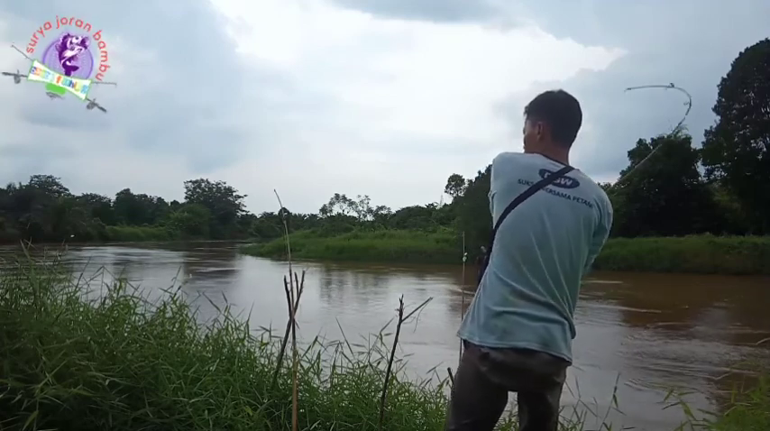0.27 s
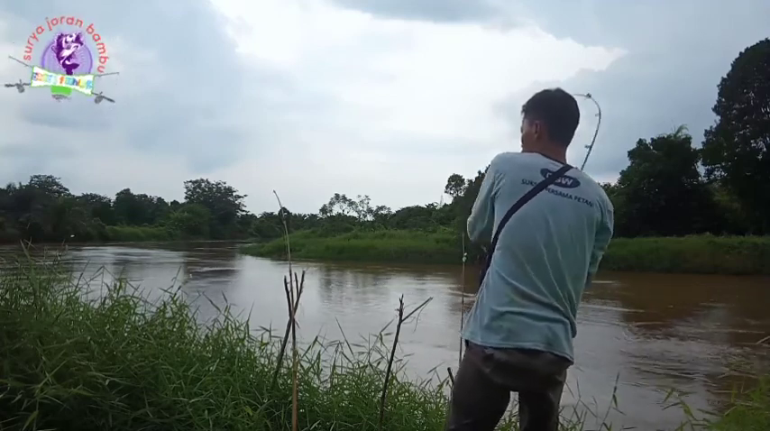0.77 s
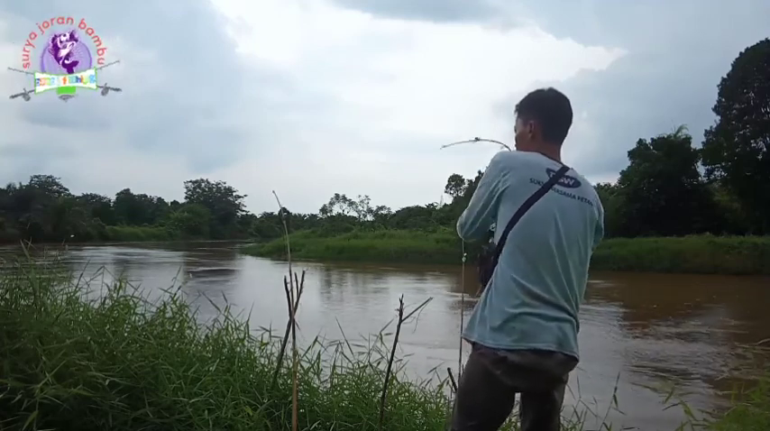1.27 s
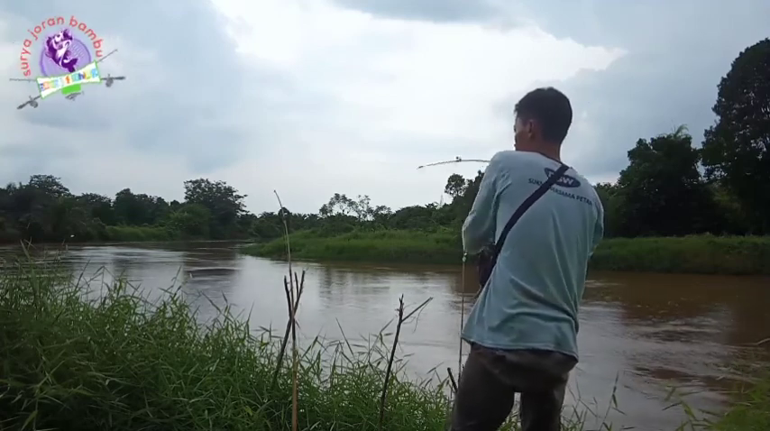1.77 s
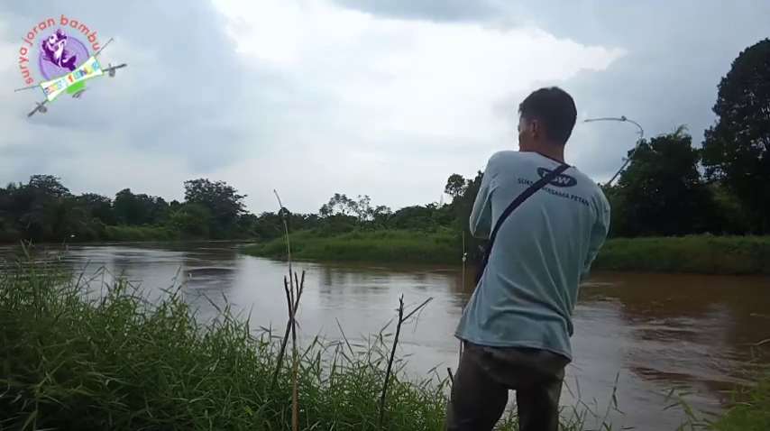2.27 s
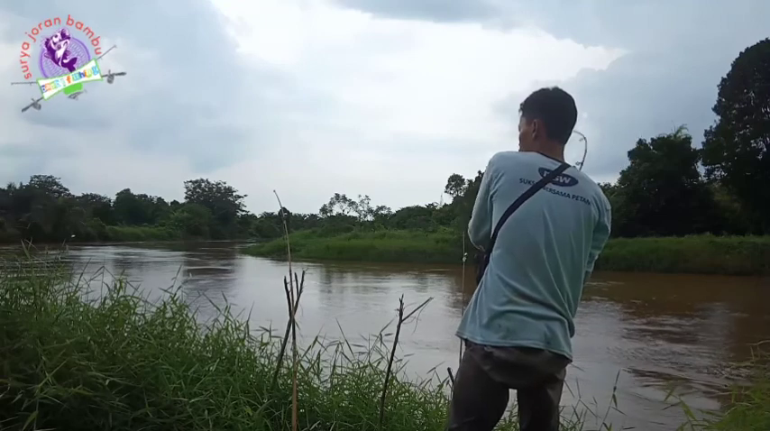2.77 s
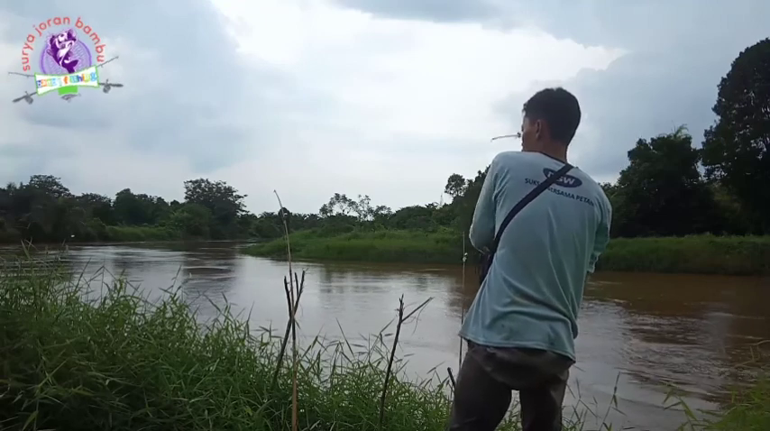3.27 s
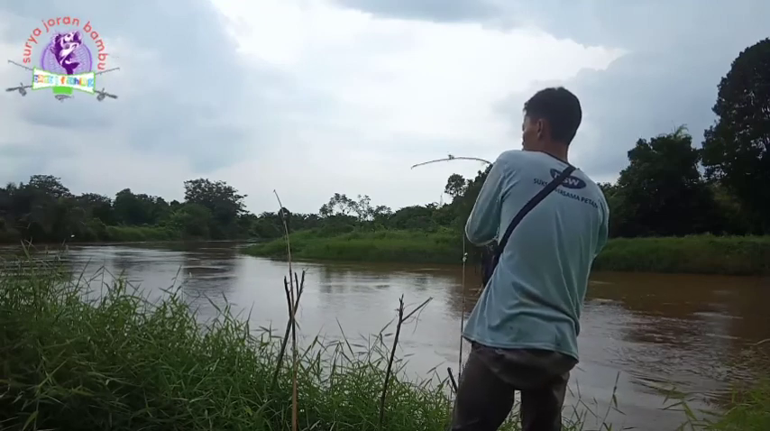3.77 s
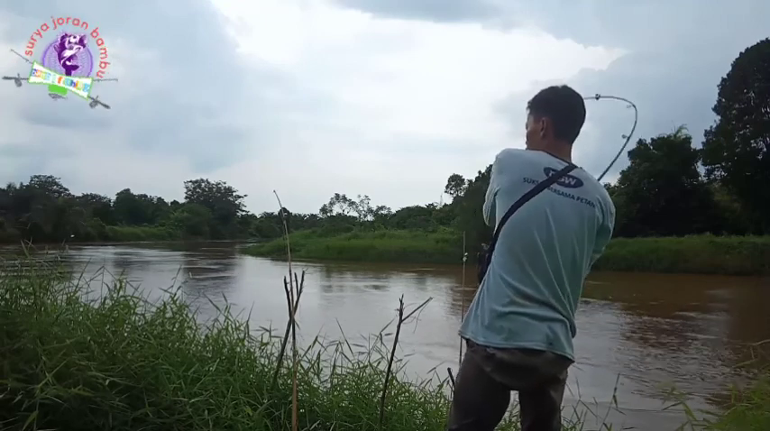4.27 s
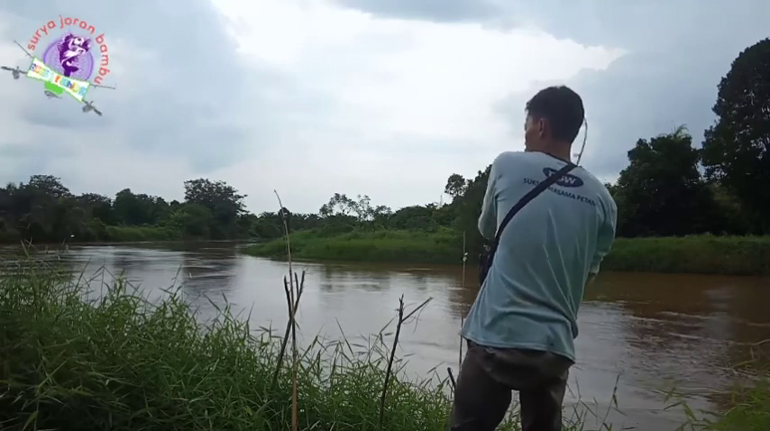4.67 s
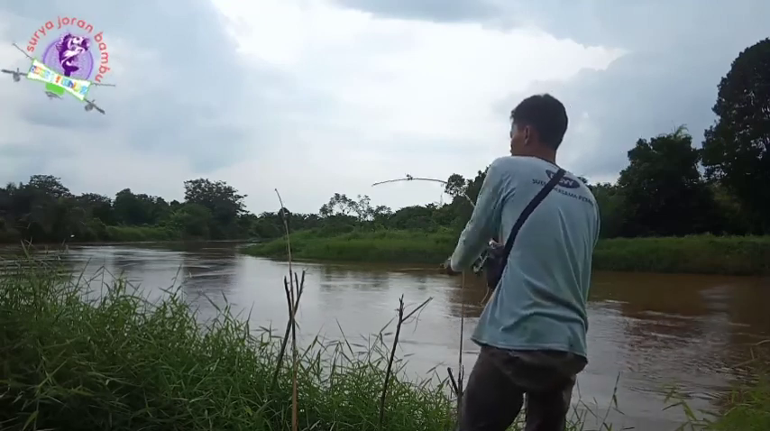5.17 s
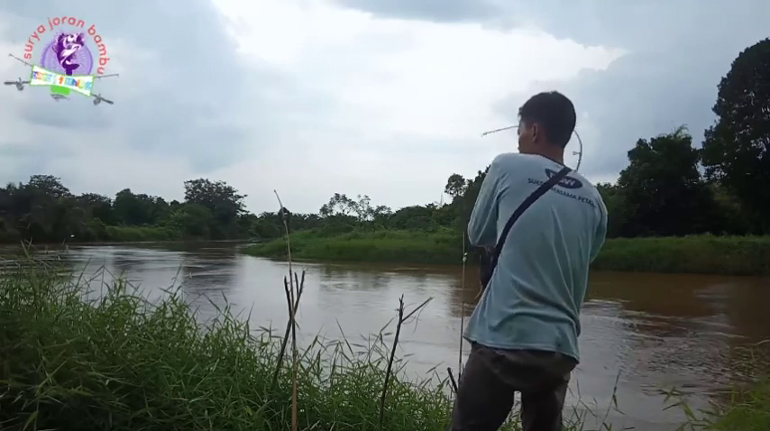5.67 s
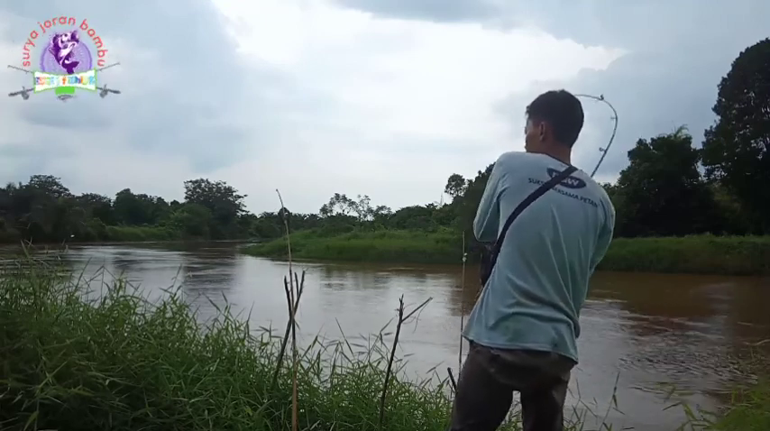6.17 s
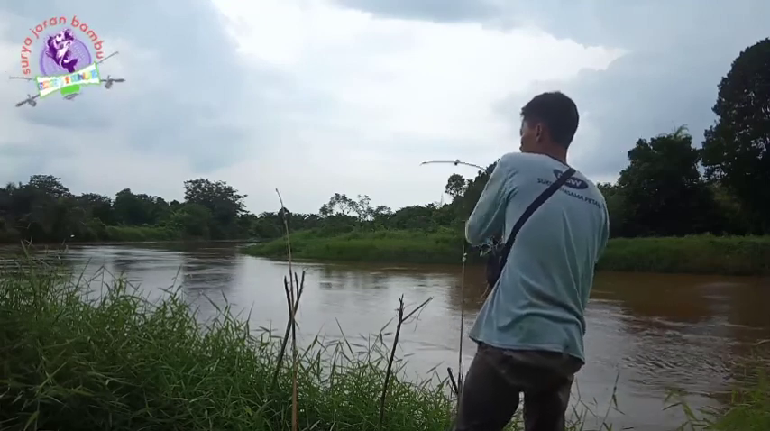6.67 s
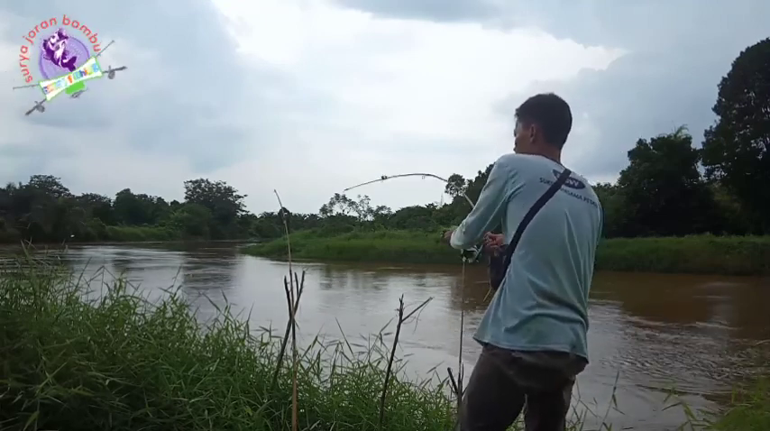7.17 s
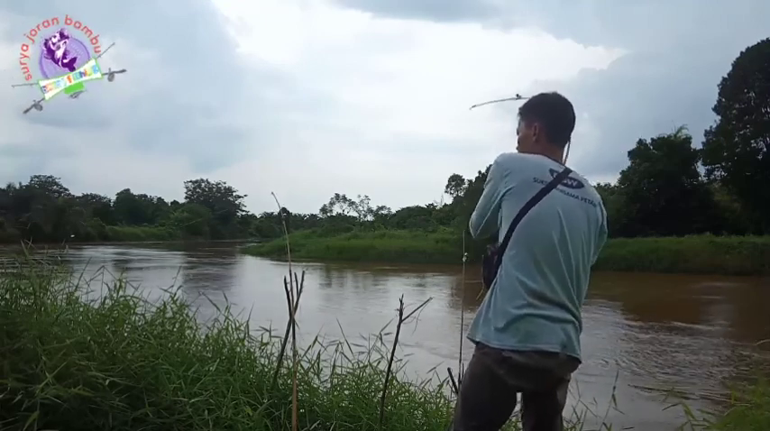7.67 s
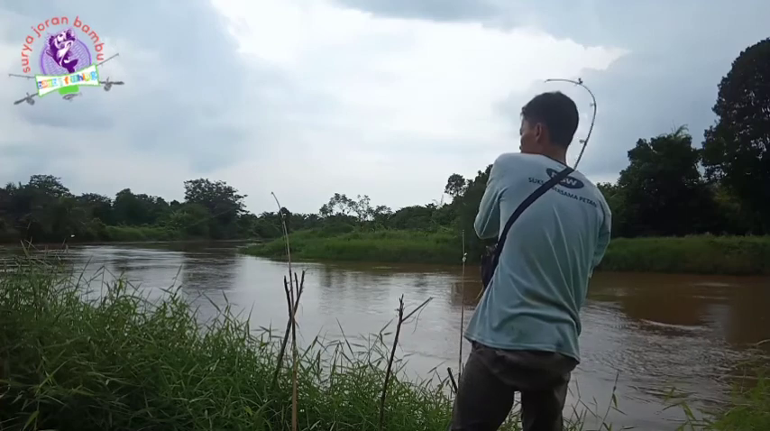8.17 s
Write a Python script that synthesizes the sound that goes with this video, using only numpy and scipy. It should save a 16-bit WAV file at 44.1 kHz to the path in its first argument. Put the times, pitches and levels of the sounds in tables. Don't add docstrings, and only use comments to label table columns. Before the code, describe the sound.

Bright, dry jingling and ticking from rod bells, with hard reel-handle knocks in stop-and-start winding, beside a softly hissing river with a faint bird.

```python
import sys
import numpy as np
from scipy import signal
from scipy.fft import rfft, irfft, next_fast_len
from scipy.io import wavfile
from scipy.ndimage import uniform_filter1d, map_coordinates

SR = 44100
rng = np.random.default_rng(int(sys.argv[2]) if len(sys.argv) > 2 else 0)


def boost_factor(decibels):
    exponent = np.asarray(decibels, float) / 20
    return 10 ** exponent


def transcribe(signal):
    frames = np.atleast_2d(signal).T
    limited = np.clip(frames, -1, 1)
    pcm = np.round(limited * 32767).astype(np.int16)
    wavfile.write(sys.argv[1], SR, pcm)


N = 370440


def unit(x):
    return x / np.sqrt(np.mean(x ** 2) + 1e-20)


def along(points, hz):
    f, v = np.transpose(points)
    return np.interp(np.log(hz + 1), np.log(f + 1), v)


def curves(rows):
    s, *columns = np.transpose(rows)
    return [np.interp(np.arange(N) / SR, s, column) for column in columns]


def wobble(rate):
    knots = rng.standard_normal(int(N * rate / SR) + 4)
    return map_coordinates(knots, [np.arange(N) * rate / SR])


def filtered(x, response):
    m = next_fast_len(N + SR // 2)
    return irfft(rfft(x, m) * response(np.fft.rfftfreq(m, 1 / SR)), m)[..., :N]


def resonances(modes):
    def response(f):
        total = 0
        for k, (hz, width, db) in enumerate(modes):
            damping = 1j * f * width
            total = total + (-1) ** k * boost_factor(db) * damping / (hz * hz - f * f + damping)
        return total
    return response


def peak(x, hz, width):
    return signal.lfilter(*signal.iirpeak(hz, hz / width, SR), x)


def impulses(s, gain):
    return np.bincount(np.clip(np.round(s * SR).astype(int), 0, N - 1), gain, N)


# hz, density_db
WATER_SPECTRUM = [(20, -28), (45, -9.5), (90, -2.5), (160, -2.5), (640, -10.5), (3200, -15.5), (4600, -14),
                  (16000, -55)]
# hz, density_db
INSECT_SPECTRUM = [(3500, -45), (5600, -16), (6900, -8), (9900, -18), (13000, -6), (15200, -6.5),
                   (15800, -8)]


def river(patchy_db):
    z = signal.stft(rng.standard_normal(N), nperseg=512)[2]
    field = uniform_filter1d(rng.standard_normal(z.shape), size=6, axis=0)
    field = uniform_filter1d(field, size=12, axis=1)
    noise = signal.istft(z * boost_factor(patchy_db * unit(field)), nperseg=512)[1][:N]

    def colour(hz):
        return np.hypot(boost_factor(along(WATER_SPECTRUM, hz)), boost_factor(along(INSECT_SPECTRUM, hz)))
    return boost_factor(-54.5 + 2.5) * unit(filtered(noise, colour))


# hz, width_hz, level_db
WING_MODES = [(10500, 280, -7), (13500, 200, -4), (14400, 700, -4), (15000, 500, -3), (15500, 300, -4)]


def katydid():
    level_db, strokes_per_s, sharpness = -61, 18.1, 1.5
    turns = np.cumsum(strokes_per_s * (1 + 0.038 * wobble(2.6))) / SR
    strokes = np.abs(np.sin(np.pi * turns)) ** (2 * sharpness) * boost_factor(1.7 * wobble(1.6))
    rasp = strokes * rng.standard_normal(N)
    return boost_factor(level_db) * unit(filtered(rasp, lambda hz: resonances(WING_MODES)(hz) ** 2))


# hz, t60_s
BANK_DECAY = [(800, 0.99), (4000, 0.061), (12000, 0.5)]


def bank(x):
    hz, t, z = signal.stft(rng.standard_normal(SR // 2), SR, nperseg=256)
    decay = boost_factor(-60 * t / along(BANK_DECAY, hz)[:, None])
    tail = signal.istft(z * decay, SR, nperseg=256)[1]
    return signal.fftconvolve(x, tail / np.linalg.norm(tail))[:N]


# start_s, pitch_hz, level_db
WHISTLES = [
    [(1.34, 981, -70), (1.39, 1450, -60), (1.415, 1756, -59), (1.432, 1817, -51.5), (1.47, 1285, -63)],
    [(2.675, 1350, -66), (2.69, 1557, -56), (2.71, 1790, -56), (2.735, 1830, -61), (2.76, 1546, -54),
     (2.775, 1370, -62)],
    [(3.05, 944, -72), (3.17, 1000, -79), (3.31, 960, -68), (3.42, 927, -77)],
    [(8.21, 975, -74), (8.29, 1255, -69), (8.345, 1780, -57.5), (8.37, 1920, -53), (8.4, 1260, -67)],
]


def bird():
    out, t = np.zeros(N), np.arange(N) / SR
    for call in WHISTLES:
        hz, db = curves(call)
        hz = uniform_filter1d(hz, size=400)
        sounding = (t > call[0][0]) * (t < call[-1][0])
        level = boost_factor(db + 5 + 1.2 * wobble(40))
        out += sounding * level * np.sin(2 * np.pi * np.cumsum(hz) / SR)
    return out


# start_s, end_s, first_shaking_db, last_shaking_db, gear_whirr_db
WINDING_BOUTS = [(0.0, 0.218, -53, -54, -65.5), (0.343, .42, -60, -60, -62), (0.515, 0.781, -55, -48, -54),
                 (0.787, 1.668, -44, -46, -53), (1.726, 2.296, -52, -62, -65),
                 (2.374, 2.803, -49.5, -44.5, -55), (2.805, 2.974, -45.5, -49.5, -53),
                 (3.015, 3.42, -49, -55.5, -55.5), (3.448, 3.859, -50, -44.5, -56),
                 (3.901, 4.425, -55, -60, -79), (4.527, 5.34, -51, -41.5, -56),
                 (5.45, 5.754, -52.5, -59.5, -64), (5.833, 6.29, -104, -56, -63),
                 (6.3, 6.55, -58, -47, -57), (6.554, 7.115, -44.5, -46.5, -53),
                 (7.211, 7.428, -56, -57, -75), (7.493, 8.122, -53.5, -62, -66),
                 (8.22, 8.384, -58, -49, -59)]


def winding():
    rise_s, stop_s, stop_db, settle_db_per_s = 0.03, 0.06, 14, 29.5
    shake, whirr = np.full(N, -77.0), np.full(N, -71.0)
    tail_db = -stop_db - 2 * settle_db_per_s
    for start, end, first_db, last_db, whirr_db in WINDING_BOUTS:
        s = [start - rise_s, start, end, end + stop_s, end + stop_s + 2]
        shaking = [-90, first_db, last_db, last_db - stop_db, last_db + tail_db]
        whirring = [-90, whirr_db, whirr_db, whirr_db - stop_db, whirr_db + tail_db]
        bout = curves(np.transpose([s, shaking, whirring]))
        shake, whirr = np.maximum(shake, bout[0]), np.maximum(whirr, bout[1])
    return shake, whirr


# start_s, peak_db, spool_ring_db (relative to the peak)
HANDLE_KNOCKS = [(0.766, -30.5, -18.5), (0.8542, -32.5, -13), (1.1067, -41, -18), (1.29, -31.5, -25),
                 (1.38, -32.5, -20), (1.4712, -32.5, -23), (1.5745, -33.5, -20), (1.7678, -35.5, -20),
                 (2.375, -32, -17.5), (2.495, -38.5, -25), (2.665, -37, -16), (3.236, -43, -15),
                 (3.4428, -33.5, -24), (3.5363, -30, -21), (3.6262, -38, -21), (3.696, -38, -29),
                 (3.8103, -33.5, -27), (4.5505, -37, -12), (4.835, -33.5, -23), (4.9334, -35, -17),
                 (5.086, -28.5, -32.5), (5.153, -33, -26.5), (5.23, -25, -28), (5.3233, -38, -28),
                 (6.4626, -38.5, -25), (6.545, -32.5, -32), (6.747, -32.5, -36), (6.918, -32, -25),
                 (7.0318, -34, -24), (7.8079, -44.5, -20)]
# hz, width_hz, level_db
BODY_MODES = [(926, 46, -13), (1900, 210, -15), (2326, 36, -1), (3142, 90, 4)]
# hz, t60_s
SPOOL_MODE = (1354, 0.071)


def knocks():
    rows = np.array(HANDLE_KNOCKS)
    s, peak_db, spool_db = rows.T
    again = 0.001945 + 0.00315 * rng.random(len(rows))
    luck_db = 3 * rng.uniform(-1, 1, (len(rows), len(BODY_MODES)))
    body = np.zeros(N)
    for k, (hz, width, db) in enumerate(BODY_MODES):
        mode_db = peak_db + db + luck_db[:, k]
        blows = impulses(s, boost_factor(mode_db + 27.5)) + impulses(s + again, boost_factor(mode_db + 21.5))
        body += (-1) ** k * peak(blows, hz, width)
    t = np.arange(SR // 5) / SR
    puff = np.abs(signal.fftconvolve(impulses(s, boost_factor(peak_db - 0.5)), boost_factor(-60 * t / 0.023))[:N])
    crack = puff * rng.standard_normal(N)
    for _ in range(2):
        crack = peak(crack, hz=3030, width=3500)
    spool_hz, spool_t60_s = SPOOL_MODE
    tone = np.sin(2 * np.pi * spool_hz * t) * boost_factor(-60 * t / spool_t60_s) * (1 - np.exp(-t / 0.0055))
    spool = signal.fftconvolve(impulses(s, boost_factor(peak_db + spool_db + 7.5)), tone)[:N]
    return peak(body, hz=2500, width=11000) + crack + spool


# hz, width_hz, level_db
GEAR_MODES = [(960, 450, -5.5), (1350, 220, -2.5), (1830, 380, -2.5), (2396, 200, -1), (3066, 580, 0.5)]


def gears(whirr_db):
    mesh = rng.standard_normal(N) * boost_factor(2.45 * wobble(22))
    return unit(filtered(mesh, resonances(GEAR_MODES))) * boost_factor(whirr_db - 4.5)


# hz, pitch_wander (share), level_db (over the whirr)
BEARING_SQUEAKS = [(974, .07, -14), (1697, 0.044, -21), (1880, 0.034, -12)]


def bearing(whirr_db):
    squeak = np.zeros(N)
    for hz, wander, db in BEARING_SQUEAKS:
        pitch = hz * (1 + wander * wobble(4.6) + 0.0124 * wobble(90))
        level = boost_factor(db + 8.3 * np.tanh(wobble(11)))
        squeak += np.sin(2 * np.pi * np.cumsum(pitch) / SR) * level
    return squeak * boost_factor(whirr_db - 7.5)


# start_s, tick_peak_db, low_bell_db, high_bell_db
FIRST_STRIKES = [(0.0035, -38, -39, -50), (0.0138, -41, -55, -55), (0.0741, -24.5, -40, -44),
                 (0.1116, -44, -44, -47), (0.1249, -54, -38, -43), (0.1595, -37, -42, -43),
                 (0.1915, -31, -43, -41), (0.1997, -30, -39.5, -49), (0.2108, -40, -55, -62),
                 (0.2467, -46, -50, -58), (0.3453, -39, -48, -54), (0.3976, -41, -54, -60),
                 (0.5113, -23.5, -46, -39.5), (0.5188, -37, -44, -50), (0.5544, -47, -54, -46),
                 (0.5796, -32, -44.5, -45), (0.6585, -33, -43, -41), (0.6586, -23, -37.5, -40),
                 (0.6724, -37, -47, -53), (0.7039, -43, -48, -47), (0.7231, -44, -44, -58),
                 (0.7636, -30, -37, -36), (0.7709, -26, -34, -42), (0.805, -27, -42, -36),
                 (0.8413, -27, -38, -33), (0.8477, -28, -33.5, -38), (0.861, -43, -50, -44),
                 (0.8842, -45, -54, -45), (0.922, -35, -44, -55), (0.9421, -37, -41, -39),
                 (0.9691, -37, -36, -35.5), (0.9767, -39, -42, -46), (0.9959, -34, -38, -38),
                 (1.0124, -37, -44, -42), (1.0166, -33, -40, -36), (1.0325, -31, -41, -36),
                 (1.095, -32, -49, -36.5), (1.1131, -32, -38, -45), (1.1512, -35, -44, -38),
                 (1.1879, -24, -43, -40)]
SECOND_STRIKES = [(1.2013, -27, -37, -42), (1.25, -27, -40.5, -37), (1.29, -20, -39.5, -48),
                  (1.3603, -26, -43, -33), (1.387, -26, -43, -40), (1.4303, -29, -39, -41),
                  (1.4533, -31, -50, -39), (1.4663, -26, -34, -49), (1.5306, -31, -43, -40.5),
                  (1.5597, -36, -43, -42), (1.575, -20.5, -37.5, -47), (1.59, -38, -45, -36.5),
                  (1.6264, -34, -35, -42), (1.6394, -58, -46, -44), (1.6639, -23, -39.5, -39),
                  (1.6751, -29, -50, -54), (1.729, -37, -45, -46), (1.7565, -46, -57, -40.5),
                  (1.786, -34, -44, -41), (1.809, -40, -54, -52), (1.878, -41, -60, -48),
                  (1.921, -54, -52, -51), (1.9588, -64, -51, -48), (2.0728, -68, -63, -51),
                  (2.1016, -29.5, -54, -56), (2.1567, -33, -51, -60), (2.1985, -41, -48, -46),
                  (2.2071, -28, -46, -47), (2.313, -47, -52.5, -63), (2.3768, -25, -40, -33.5),
                  (2.374, -26.5, -31, -38), (2.3952, -37, -34.5, -51), (2.428, -29, -35, -39),
                  (2.4485, -44, -56, -52), (2.4834, -47, -52, -41), (2.4924, -38, -41, -53),
                  (2.5284, -40, -47, -48), (2.5555, -24, -46, -48), (2.6266, -42, -39, -51),
                  (2.65, -33, -41, -43), (2.7242, -52, -43, -49), (2.7358, -53, -37.5, -43)]
THIRD_STRIKES = [(2.7556, -26, -34.5, -40), (2.804, -33, -52, -54), (2.827, -31, -52, -42),
                 (2.8765, -44, -49, -46), (2.9065, -22, -59, -43), (2.919, -43, -37, -45),
                 (2.95, -40, -45, -52), (3.0244, -33, -42, -44), (3.0433, -29, -38, -42),
                 (3.0724, -37, -39, -42), (3.086, -40, -47, -49), (3.1263, -34, -39.5, -46),
                 (3.1403, -28, -38, -40), (3.1469, -42, -48, -47), (3.2397, -34, -38.5, -43),
                 (3.266, -38, -57, -58), (3.272, -43, -41, -41.5), (3.299, -59, -53, -59),
                 (3.372, -49, -52, -56), (3.405, -40, -51, -42), (3.4425, -25, -43.5, -50),
                 (3.49, -34, -48, -43), (3.5322, -21, -34.5, -42), (3.563, -29, -39, -38),
                 (3.5817, -22, -45, -36), (3.6163, -23, -44, -36), (3.6265, -26, -32.5, -42),
                 (3.6344, -44, -46, -39), (3.6533, -28, -39, -33), (3.6628, -52, -46, -44),
                 (3.6864, -17, -40, -38.5), (3.738, -25, -48, -36), (3.8152, -41, -38, -39),
                 (3.8288, -45, -43, -44), (3.896, -46, -50, -50), (3.9433, -41, -53, -48.5),
                 (4.0044, -54, -51, -46.5), (4.0618, -52, -43.5, -52), (4.0944, -55, -43, -54),
                 (4.1278, -47, -53, -46), (4.1987, -41, -53, -52), (4.2488, -38, -48.5, -59),
                 (4.2757, -42, -47, -62), (4.3287, -48, -65, -53), (4.3643, -49, -59, -47),
                 (4.4, -45, -61, -46.5), (4.4215, -59, -71, -67)]
HARDEST_STRIKES = [(4.4756, -51, -63, -67), (4.512, -26.5, -39, -52), (4.5528, -16, -31, -35),
                   (4.5677, -47, -38, -50), (4.5834, -22, -35, -35), (4.6217, -34, -51, -44.5),
                   (4.6914, -28, -47, -38), (4.749, -41, -46, -44), (4.7653, -50, -61, -64),
                   (4.782, -37, -50, -45), (4.827, -25, -41, -42), (4.8345, -22, -37, -34.5),
                   (4.847, -49, -44, -45), (4.8853, -47, -48, -44), (4.9003, -38, -44, -43),
                   (4.9292, -17, -47, -39), (4.9556, -22, -42, -47), (5.0125, -23, -44, -46),
                   (5.0201, -24, -48, -35), (5.031, -27, -35.5, -44), (5.05, -31, -39, -48),
                   (5.066, -20, -43, -35), (5.078, -22, -41, -33), (5.0995, -20, -43, -35),
                   (5.128, -26.5, -39, -31.5), (5.1428, -27, -38, -34), (5.188, -24, -53, -33.5),
                   (5.201, -28, -41.5, -48), (5.2315, -19.5, -39, -35), (5.2366, -39, -35, -50),
                   (5.2523, -47, -33, -33.5), (5.2673, -45, -49, -38), (5.2915, -47, -40, -46),
                   (5.314, -21, -42, -41), (5.3256, -22.5, -36.5, -38), (5.3406, -42, -41, -43),
                   (5.3578, -42, -38, -38), (5.3631, -32, -41, -50), (5.3896, -41, -53, -60)]
FIFTH_STRIKES = [(5.4533, -35, -53, -38.5), (5.473, -49, -58, -36), (5.507, -43, -45, -52),
                 (5.563, -52, -47, -51), (5.618, -41, -58, -49), (5.6707, -36, -39.5, -43),
                 (5.68, -39, -48, -58), (5.7305, -44, -46, -46), (5.749, -48, -65, -64),
                 (5.8265, -44, -49.5, -61), (5.9539, -39, -62, -49), (6.046, -46, -68, -51),
                 (6.177, -39, -53, -62), (6.2535, -46, -62, -50.5), (6.2992, -30, -47, -43),
                 (6.3734, -36, -49, -40.5), (6.3835, -49, -62, -56), (6.4054, -39, -48.5, -47),
                 (6.4597, -27.5, -41.5, -40), (6.4918, -33, -45, -35), (6.5066, -28, -41, -51),
                 (6.5356, -24, -47, -42), (6.552, -39, -38, -44), (6.6028, -47, -48, -42),
                 (6.6251, -22.5, -48, -45), (6.665, -41, -53, -40), (6.6827, -38, -42, -37.5),
                 (6.7466, -28, -43, -52), (6.7893, -32, -38, -42), (6.799, -35, -50, -54),
                 (6.826, -27, -41, -40), (6.841, -33, -44, -50), (6.8667, -27, -40, -41),
                 (6.9125, -33, -35, -51), (6.9172, -20.5, -36, -37), (6.9283, -47, -50, -42),
                 (6.944, -37, -60, -61), (6.9648, -37, -50, -46), (6.9955, -29, -40.5, -52)]
LAST_STRIKES = [(7.0356, -30, -51, -39.5), (7.0823, -28, -46, -39), (7.092, -40, -55, -48),
                (7.1491, -38, -57, -41), (7.1693, -35, -64, -59), (7.2156, -48, -57, -45),
                (7.2555, -42, -59, -41), (7.337, -43, -56, -44), (7.355, -53, -42, -47),
                (7.488, -43, -49, -52), (7.5111, -43, -55, -46), (7.572, -45, -54, -46),
                (7.6432, -32, -49, -39.5), (7.694, -26.5, -37.5, -41.5), (7.7352, -62, -49, -57),
                (7.7585, -37, -57, -49), (7.7968, -40, -42, -52), (7.8687, -33, -40, -56),
                (7.881, -57, -53, -62), (7.9328, -37, -48.5, -55), (8.026, -39, -46.5, -61),
                (8.097, -59, -55, -56), (8.2274, -46, -53, -51), (8.25, -34, -62, -44),
                (8.2732, -41, -51, -61), (8.3117, -42, -45.5, -48)]


def strikes():
    early = FIRST_STRIKES + SECOND_STRIKES + THIRD_STRIKES
    late = HARDEST_STRIKES + FIFTH_STRIKES + LAST_STRIKES
    return np.array(sorted(early + late))


def jolts(shake_db):
    s, tick_db, _, _ = strikes().T
    t = np.arange(SR // 8) / SR
    fading = boost_factor(-800 * t) * (1 - np.exp(-t / 0.0029))
    after = np.abs(signal.fftconvolve(impulses(s, boost_factor(tick_db - 21.5)), fading)[:N])
    return after / boost_factor(shake_db)


# hz, width_hz, level_db
CLICK_MODES = [(5930, 1500, 4)]


def clicks(touched):
    s, tick_db, _, _ = strikes().T
    tick_db = tick_db - 0.5
    luck = rng.random((len(s), 2, 5))
    after = np.cumsum(0.0007 + 0.0054 * luck[:, 0], axis=1)
    bounce_db = tick_db[:, None] - 6 - 300 * after - 10 * luck[:, 1]
    bounces = impulses((s[:, None] + after).ravel(), boost_factor(bounce_db).ravel())
    blows = impulses(s, boost_factor(tick_db)) + bounces + touched
    return boost_factor(13) * filtered(blows, lambda hz: resonances(CLICK_MODES)(hz) ** 2)


# hz, level_db
TICK_SPECTRUM = [(1500, -16.5), (3500, -9), (4500, 12), (6000, -10), (7400, -6), (9300, -18), (12000, -12),
                 (15500, -17)]
# hz, width_hz, level_db
WALL_MODES = [(5240, 480, -3), (5800, 370, -1.5), (6360, 450, -3.5), (7100, 750, -5)]


def hail(bells, jolt, shake_db):
    ticks_per_s, rest_share, full_db = 230, 0.085, -51
    power = np.abs(uniform_filter1d(bells ** 2, size=300)) + 1e-9
    surge = (power / uniform_filter1d(power, size=9000)) ** 0.013
    share = np.clip(boost_factor(shake_db - full_db), rest_share, 1)
    landed = (rng.random(N) < share * ticks_per_s / SR) / np.sqrt(share)
    pulses = landed * boost_factor(4.4 * rng.random(N) ** 2) * rng.choice([-1, 1], N)
    pulses = unit(unit(pulses) + 0.2 * share * rng.standard_normal(N))
    pulses = unit(pulses * boost_factor(2.6 * np.tanh(wobble(70))) * surge)
    pulses = pulses * (0.33 + jolt) * boost_factor(shake_db + 2.5)
    spot = rng.integers(len(WALL_MODES), size=N)
    rung = np.zeros(N)
    for k, (hz, width, db) in enumerate(WALL_MODES):
        rung += peak(pulses * (spot == k), hz, width) * boost_factor(db + 20.5)

    def colour(hz):
        return boost_factor(along(TICK_SPECTRUM, hz))
    gain = 0.45 / np.std(filtered(rng.standard_normal(N), colour))
    return rung + gain * filtered(pulses, colour)


def touch_times(rate, shake_db):
    busy = rate * (0.75 + 1.7 * np.clip((shake_db + 60) / 15, 0, 1))
    steps = np.cumsum(0.25 + 0.75 * rng.exponential(size=1500))
    return np.interp(steps, np.cumsum(busy) / SR, np.arange(N) / SR, right=N)


def ring(struck_s, struck_db, shake_db, rest_db, slope, hz, db, fall_db, scatter_db, detune, rate):
    pivot_db, forget_db_per_s = -46.5, 208
    t = np.arange(N) / SR
    touches = np.sort(np.r_[0, struck_s, touch_times(rate, shake_db)])
    last = np.searchsorted(touches, t, "right") - 1
    age = t - touches[last]
    strong = np.searchsorted(struck_s, touches, "right") - 1
    since = np.abs(touches - struck_s[strong])
    shaken_db = slope * (np.interp(touches, t, shake_db) - pivot_db) + pivot_db + rest_db
    luck = rng.standard_normal((len(touches), 3))
    chance_db = scatter_db * np.clip(luck[:, 0], -2.5, 1.2) * np.where(since > 0, 1, 0.34)
    memory_db = struck_db[strong] - forget_db_per_s * since
    start_db = np.maximum(memory_db, shaken_db - 30 * (since == 0)) + chance_db
    pitch = (hz * (1 + detune * luck[:, 1]))[last]
    level_db = start_db[last] + db - fall_db * age + 3.95 * np.tanh(wobble(230))
    level = boost_factor(level_db) * (1 - np.exp(-age / 0.00021))
    touched = impulses(touches, boost_factor(start_db + 14) * (since > 0) * (touches < N / SR))
    return np.array([level * np.sin(2 * np.pi * pitch * age + 9 * luck[last, 2]), touched])


def ringing(shake_db):
    s, _, low_db, high_db = strikes().T
    both_db = np.maximum(low_db, high_db)

    def ring_at(struck_db, rest_db, **mode):
        return ring(s, struck_db - 2, shake_db, rest_db, **mode)
    low = ring_at(low_db, rest_db=-3.0, slope=0.9, hz=4353, db=2.5, fall_db=210,
                  scatter_db=2.0, detune=0.0039, rate=3.7)
    high = ring_at(high_db, rest_db=-2.5, slope=0.96, hz=4625, db=2.5, fall_db=221,
                   scatter_db=2.5, detune=0.0019, rate=3)
    side = sum(ring_at(both_db - 5.5, 1.3, slope=0.73, hz=hz, db=db, fall_db=150,
                       scatter_db=6, detune=0.004, rate=12) for hz, db in [(5200, -5.0), (5420, -9.5)])
    over = sum(ring_at(both_db - 6.0, 1.13, slope=0.51, hz=hz, db=-3.0, fall_db=357,
                       scatter_db=7.5, detune=0.0032, rate=15) for hz in (11250, 11410))
    top = sum(ring_at(both_db - 4.5, 1.8, slope=0.79, hz=hz, db=-4.5, fall_db=406,
                      scatter_db=9.0, detune=0.0025, rate=18) for hz in (12200, 12670))
    dulling = boost_factor(-0.5 * (np.arange(N) - N / 2) / SR)
    bells, touched = low + high
    return bells, touched, side[0] + dulling * (over + top)[0]


def scene():
    shake_db, whirr_db = winding()
    bells, touched, overtones = ringing(shake_db)
    jolt = jolts(shake_db)
    overtones = overtones * (0.76 + 0.5 * np.tanh(jolt))
    bells = bells * (0.87 + 0.38 * np.tanh(jolt))
    jingle = bells + overtones + clicks(touched) + hail(bells, jolt, shake_db)
    reel = knocks() + gears(whirr_db) + bearing(whirr_db)
    near, far = jingle + reel, bird()
    echo = bank(boost_factor(-16) * near + boost_factor(-9.0) * far)
    mono = near + far + echo + river(patchy_db=1.5) + katydid()
    return np.array([mono, mono])


def low_pass(x):
    return signal.sosfilt(signal.butter(12, 15760, fs=SR, output="sos"), x)


def record(dry):
    top_hz = 15760
    mix = filtered(dry, lambda hz: hz < top_hz)
    return low_pass(mix)


dry = scene()
out = record(dry)
transcribe(out)
```